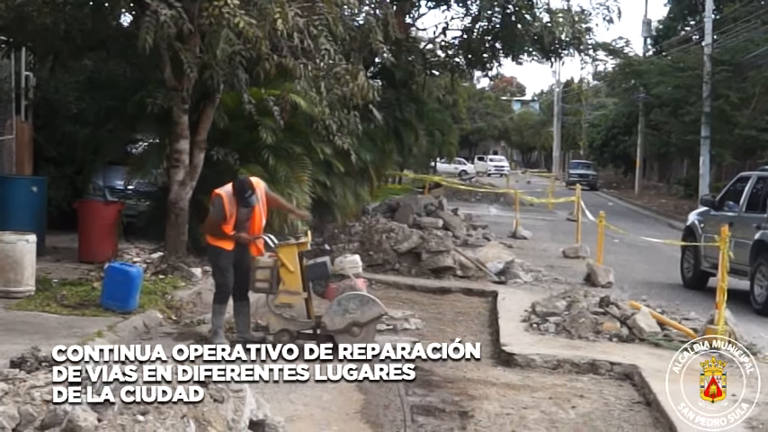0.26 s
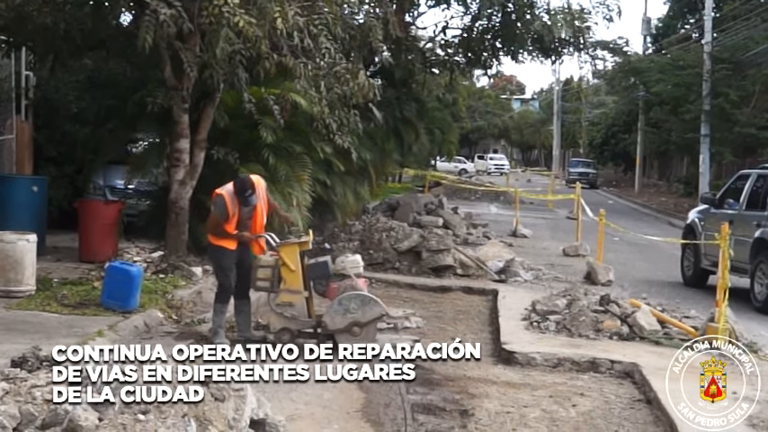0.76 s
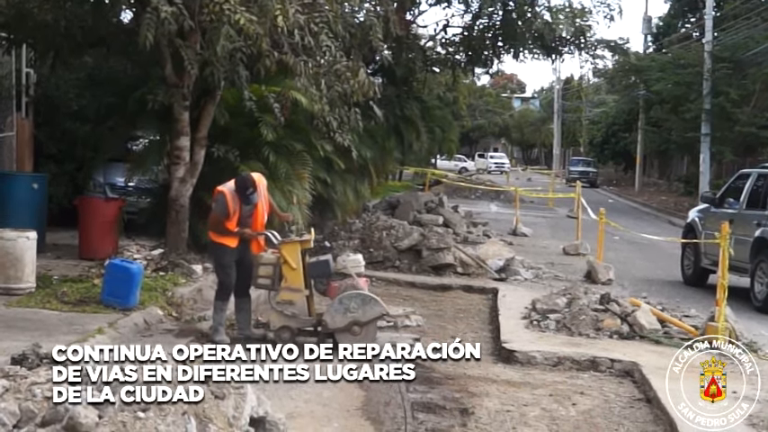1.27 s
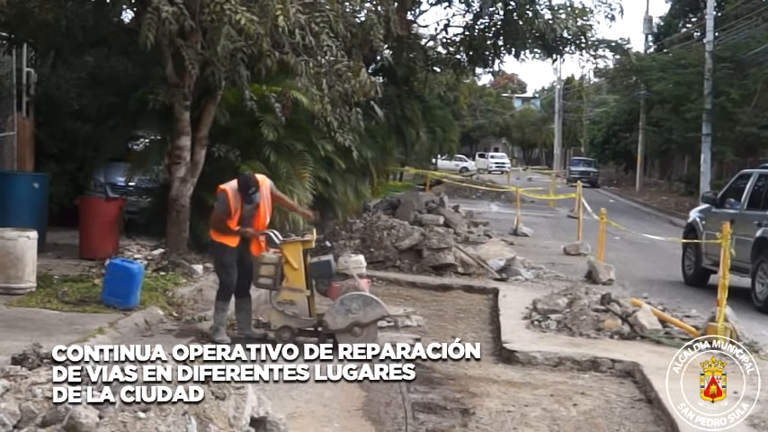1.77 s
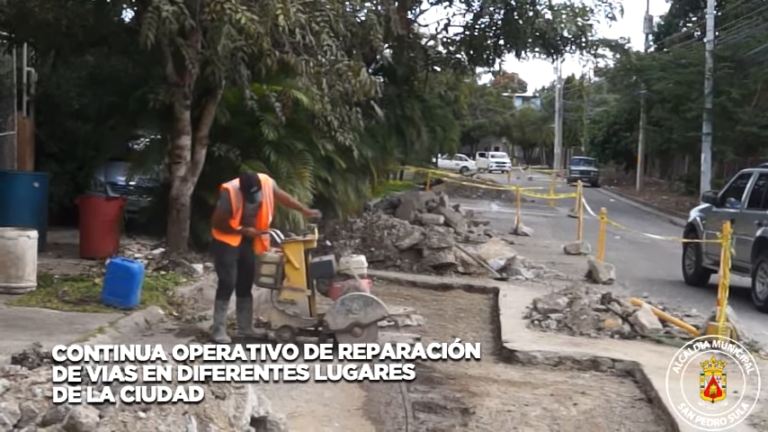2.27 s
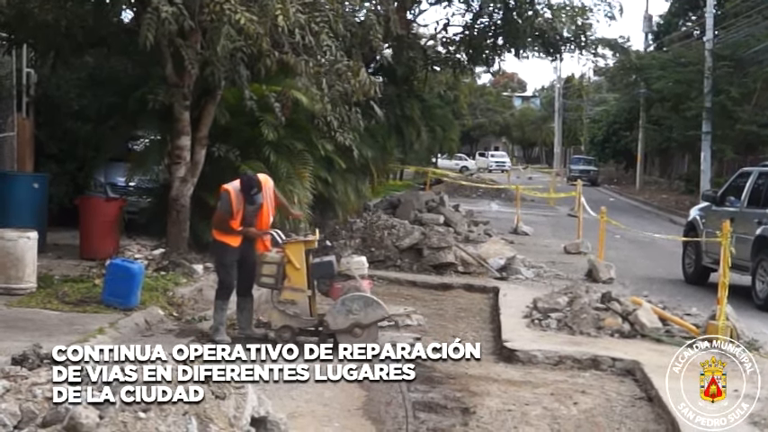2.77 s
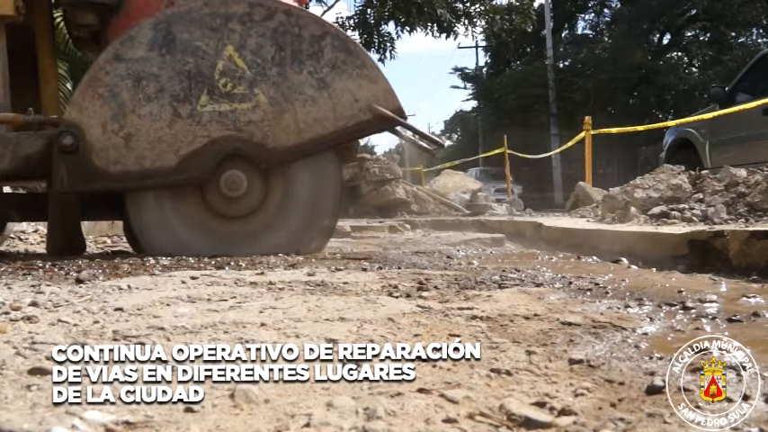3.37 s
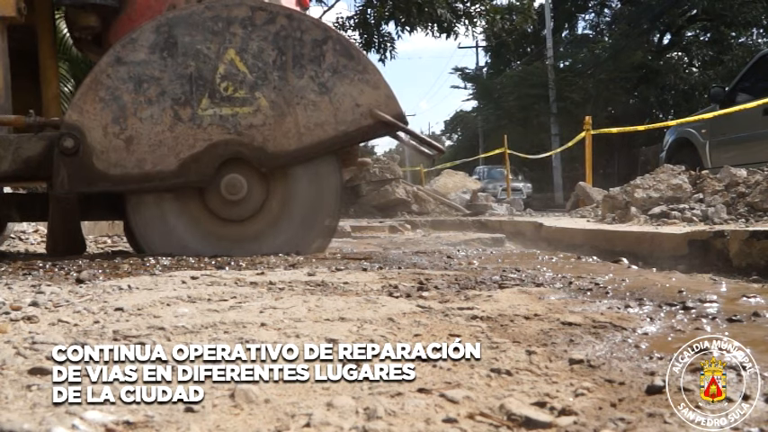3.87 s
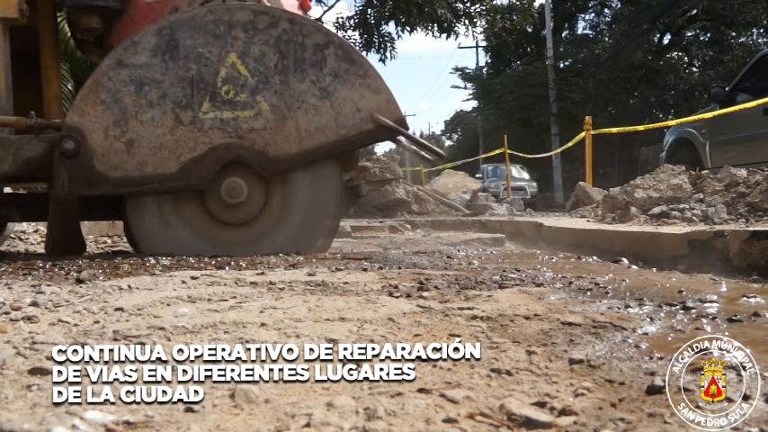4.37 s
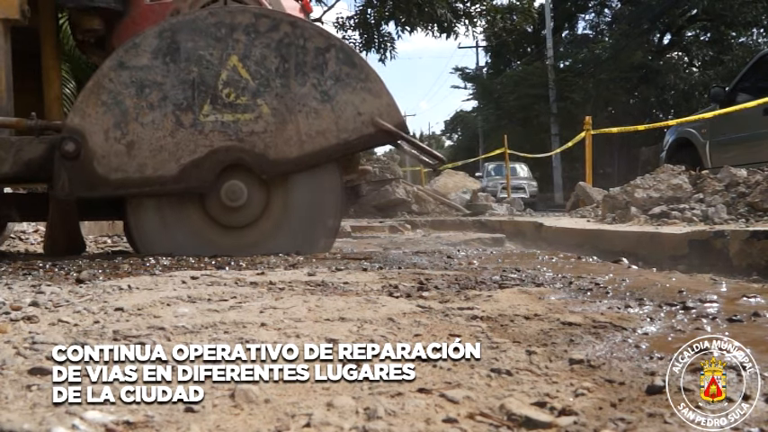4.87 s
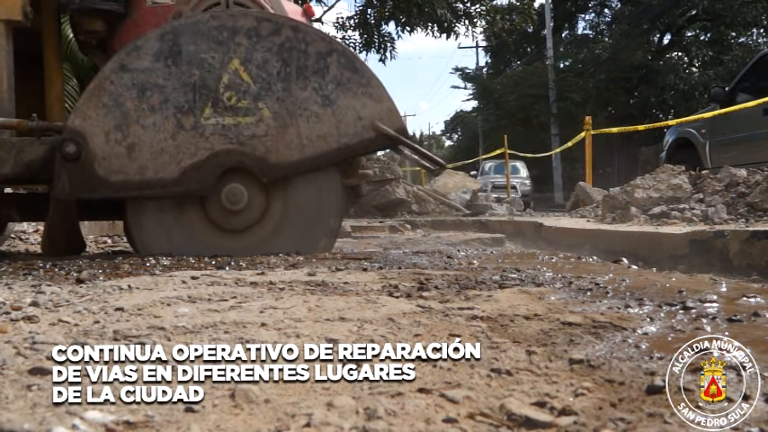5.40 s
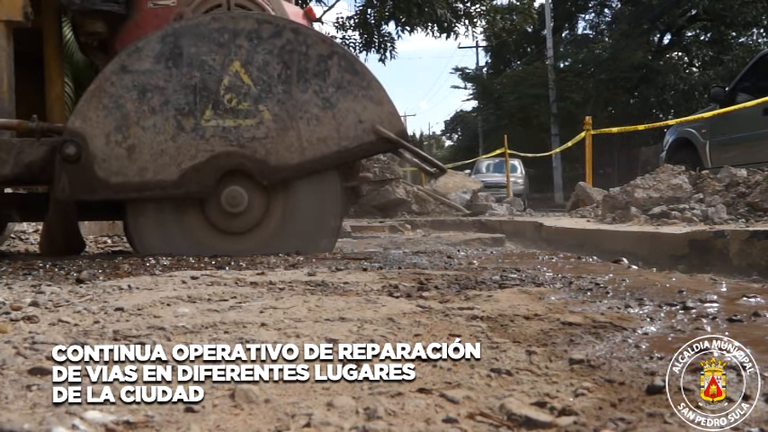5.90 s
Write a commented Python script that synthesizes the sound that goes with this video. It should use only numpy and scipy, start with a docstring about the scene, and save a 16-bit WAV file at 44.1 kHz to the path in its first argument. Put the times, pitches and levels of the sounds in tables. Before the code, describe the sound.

Outdoors at a roadworks, a petrol-powered walk-behind saw cuts wet concrete without pause. Bright, gritty hiss and thin, high metallic ringing dominate, fluttering rapidly with each blade turn. Beneath them, the steel guard drones and rasps, and a single-cylinder engine putters low. The saw labours briefly, then speeds up slightly; ringing gradually gives way to hiss. Close, dry microphone, faint broad background noise.

```python
"""Petrol saw cutting wet concrete

A walk-behind saw cuts a road outdoors. Torn grit hisses and the steel disc rings with thin high tones.
The scraping rim drones and rasps in the steel guard; a knock on every turn makes the guard boom.
Multiples of the blade speed hum in the frame; narrow bands squeal and wide bands swell breathily.
The single-cylinder engine putters below, with soft thuds and a faint, broad background noise.
The saw labours, then picks up speed; as the slot deepens, ringing gives way to hiss."""
import sys
import numpy as np
from scipy import signal
from scipy.fft import rfft, irfft, next_fast_len
from scipy.io import wavfile
from scipy.ndimage import uniform_filter1d

SR = 44100
rng = np.random.default_rng(int(sys.argv[2]) if len(sys.argv) > 2 else 0)


def store_pcm(level_fs):
    """Save levels as 16-bit WAV."""
    pcm = np.round(np.clip(level_fs, -1, 1) * 32767).astype(np.int16)
    wavfile.write(sys.argv[1], SR, np.atleast_2d(pcm).T)


N = 270950
T = np.arange(N) / SR  # time in seconds
SIZE = next_fast_len(N, real=True)
FREQ = np.maximum(np.arange(SIZE // 2 + 1) * SR / SIZE, 1)  # in Hz; the floor avoids dividing by zero
BLADE_HZ, BLADE_SAG_HZ = 28.892, 0.414  # free turning speed; how much strain slows it


def undb(db):
    """Turn decibels into gain."""
    return 10 ** (np.asarray(db) / 20)


def level(x, db=0):
    """Scale a sound to an rms level in dB."""
    return x * undb(db) / np.sqrt(np.mean(x ** 2))


def curves(table):
    """Draw straight lines through a time table and return its columns sample by sample."""
    seconds, *columns = np.transpose(table)
    return [np.interp(T, seconds, column) for column in columns]


def walk(rate):
    """Make a smooth random curve of spread 1 from `rate` random steps per second, averaged twice."""
    hold = int(SR / rate)
    steps = np.repeat(rng.standard_normal(N // hold + 1), hold)
    smooth = uniform_filter1d(uniform_filter1d(steps, hold), hold)
    return level(smooth)[:N]


def bell(centre_s, spread_s):
    """Rise and fall smoothly around one moment, as a Gaussian curve."""
    return np.exp(-0.5 * ((T - centre_s) / spread_s) ** 2)


def filtered(x, response):
    """Pass a sound through a frequency response given on FREQ."""
    return irfft(rfft(x, SIZE) * response, SIZE)[:N]


def colour(x, points):
    """Shape a sound by a spectrum of frequency and dB points, at rms 1."""
    hz, db = np.transpose(points)
    spectrum_db = np.interp(np.log(FREQ), np.log(hz), db, left=-90, right=-90)
    return level(filtered(x, undb(spectrum_db)))


def resonance(hz, width):
    """Give the frequency response of one damped mode, with gain 1 at its centre."""
    return 1 / (1 + 1j * (FREQ ** 2 - hz ** 2) / (FREQ * width))


def body(x, modes):
    """Ring a set of modes in which neighbours move in opposite directions."""
    response = 0
    for k, (hz, width, db) in enumerate(modes):
        response = response + (-1) ** k * undb(db) * resonance(hz, width)
    return level(filtered(x, response))


def glide(x, hz, width, order=1):
    """Ring a moving resonance: shift its centre down to zero, low-pass the sound and shift it back."""
    carrier = np.exp(2j * np.pi * np.cumsum(hz) / SR)
    lowpass = signal.butter(order, width / 2, fs=SR, output="sos")
    return np.real(carrier * signal.sosfilt(lowpass, x / carrier))


def revolutions(hz, start):
    """Count the turns made so far by adding up the speed."""
    return start + np.cumsum(hz) / SR


def pulse_train(at, gains_db):
    """Place one click of a given gain at each sample number."""
    return np.bincount(at, undb(gains_db), N + 1)[:N]


def contact(turns, depth_db, rise, scatter_db):
    """The eccentric blade's pressure rises for a share of each turn, then eases, never quite alike."""
    press = np.interp(turns % 1, [0, 1 - rise, 1], [1, -1, 1])
    scatter = rng.standard_normal(int(turns[-1]) + 2)
    uneven = np.interp(turns, np.arange(len(scatter)), scatter)
    return level(undb(depth_db * press + scatter_db * uneven))


def rim_scrape(turns, memory, points=1536):
    """The rim's roughness partly comes round again on every turn and changes as the cut advances."""
    track = rng.standard_normal((int(turns[-1]) + 2, points))
    for k in range(1, len(track)):
        track[k] = memory * track[k - 1] + np.sqrt(1 - memory ** 2) * track[k]
    return np.interp(turns * points, np.arange(track.size), track.ravel())


# How hard the rim grinds. Each row: time in seconds, base level of hiss and ringing together in dB.
CUT_LEVEL = [(0.0, -32.5), (.3, -31.5), (.48, -32.5), (.9, -32), (1.98, -32.5), (2.0, -30), (2.28, -31),
             (2.72, -30.2), (2.78, -32), (2.95, -29.5), (3.3, -29.5), (4.34, -30.5), (4.85, -29.5),
             (5.25, -29), (5.7, -31.5), (5.95, -32), (6.03, -30), (6.14, -32)]
# The rim bites a harder stone. Each row: time in seconds, extra pressure in dB, spread in seconds.
STONE_BITES = [(0.222, 2, 0.0063), (0.323, 4, 0.0046), (0.62, 2.5, 0.011), (1.375, 3, 0.0054),
               (1.54, 0.5, .025), (2.345, 1.5, 0.0087), (2.457, 0.5, 0.014), (4.01, 2, 0.019),
               (4.265, 0.5, 0.013)]
RING_SHARE, RING_FADE_S = 0.63, 3.4  # the disc's first share of the power; time to fall to 37 % of it


def blade(turns):
    """Grinding is shared between hissing grit and the ringing disc, which the deepening slot damps."""
    bite_db = sum(db * bell(s, spread) for s, db, spread in STONE_BITES)
    pressure = contact(turns, depth_db=2.0, rise=0.57, scatter_db=0.17) * undb(bite_db)
    share = RING_SHARE * np.exp(-T / RING_FADE_S)
    hiss = grit(pressure, share) * np.sqrt(1 - share)
    ringing = disc(pressure) * np.sqrt(share)
    return (hiss + ringing) * undb(curves(CUT_LEVEL)[0])


# Grit torn from the concrete. Each row: frequency in Hz, relative strength in dB.
HISS_SPECTRUM = [(2000, -36), (2750, -8.5), (2980, -1), (3500, 1.6), (3950, 0.5), (5100, -0.5),
                 (7150, -1.7), (7800, -3.5), (8100, -4.5), (8900, 0), (10000, -4), (10600, -4),
                 (10850, -8.5), (11400, -7.5), (13000, -11), (14500, -19.5)]
# Gaps between the disc's modes, where it radiates little of the hiss. Each entry: frequency in Hz.
HISS_GAPS = [3360, 3610, 3800, 4065, 4250, 4810, 5720, 6650, 7410, 9300]
# Tilt of the hiss. Each row: time in seconds, slope in dB per octave.
HISS_TILT = [(0, 2), (.8, 0.6), (1.7, 1), (3.7, 0), (4.9, -0.7), (6.14, -1)]
GAP_WIDTH, GAP_DEPTH = 0.011, 0.27  # share of the frequency; share of the amplitude
HOLLOW_HZ, HOLLOW_DB = 3790, -16.5  # a dip in the hiss, in proportion to the disc's share of the power
HISS_DB = 0.61  # relative to the cut


def grit(pressure, share, flicker_db=1.0, drift_db=0.5):
    """Tiny fractures merge into a hiss; its colour flickers from stone to stone and fills out in the slot."""
    hiss = colour(rng.standard_normal(N) * chipping() * pressure, HISS_SPECTRUM)
    gaps = sum(resonance(hz, GAP_WIDTH * hz) for hz in HISS_GAPS)
    hiss = level(filtered(hiss, 1 - GAP_DEPTH * gaps))
    tilt_db = curves(HISS_TILT)[0]
    octaves = np.log2(FREQ / 6000)
    out = 0
    # overlapping bands a third of an octave apart, each with its own changing level
    for centre in np.arange(-6, 6) / 3:
        band = filtered(hiss, np.maximum(1 - 3 * np.abs(octaves - centre), 0))
        hollow = np.exp(-(4 * (centre - np.log2(HOLLOW_HZ / 6000))) ** 2)
        steady_db = tilt_db * centre + HOLLOW_DB * hollow * share
        random_db = flicker_db * walk(30) + drift_db * walk(1.85)
        out = out + band * undb(steady_db + random_db)
    return out * undb(HISS_DB)


CHIPS_PER_S, CHIP_DECAY_S = 900, 0.0014  # average rate of cracks; time for a crack's power to fall to 37 %
CHIP_SCATTER_DB, CHIP_SHARE = 3, 0.28  # unevenness of the cracks; their share of the hiss power


def chipping():
    """Grains snap off at random: each crack starts at once and dies quickly, over an even abrasion."""
    happens = rng.random(N) < CHIPS_PER_S / SR
    scatter = np.clip(rng.standard_normal(N), -2, 2)
    cracks = happens * undb(CHIP_SCATTER_DB * scatter) ** 2
    power = signal.lfilter([1], [1, -np.exp(-1 / (CHIP_DECAY_S * SR))], cracks)
    return np.sqrt(1 - CHIP_SHARE + CHIP_SHARE * power / power.mean())


# Modes of the steel disc. Each row: frequency in Hz, width in Hz, relative strength in dB.
DISC_MODES = [(2995, 90, -8), (3250, 120, -10.5), (3470, 70, -12), (3690, 40, -11), (3915, 50, -11),
              (4145, 20, -4), (4323, 26, -5.5), (4478, 40, -3.5), (4936, 22, -1), (5052, 34, -6),
              (5190, 80, -8), (5525, 50, -6.5), (5927, 40, -8), (6150, 50, -10), (6320, 60, -11),
              (6512, 70, -8.5), (6885, 50, -8.5), (7020, 50, -9), (7145, 60, -8), (7590, 40, -10),
              (8020, 80, -10), (8250, 140, -11), (8680, 200, -11), (9805, 60, -12), (11080, 70, -18),
              (11770, 70, -18), (12330, 110, -22), (13030, 60, -23), (13570, 80, -21), (13950, 90, -23)]
RING_TILT_DB_PER_S = 1.0  # growth of the tilt per octave: the slot damps the low modes first
LOW_MODES_DB, LOW_MODES_RISE_S, LOW_MODES_HZ = -1.5, 0.26, 3500  # modes below 3500 Hz start weaker


def disc(pressure, wander_db=1.5, drift_db=1.0):
    """Friction drives each mode of the disc; modes grow and fade alone, and the ringing slowly brightens."""
    tilt_db = RING_TILT_DB_PER_S * T
    out, power = 0, 0
    for hz, width, db in DISC_MODES:
        octaves = np.log2(hz / 5000)
        low_db = LOW_MODES_DB * np.exp(-T / LOW_MODES_RISE_S) if hz < LOW_MODES_HZ else 0
        random_db = wander_db * walk(8.9) + drift_db * walk(1.56)
        gain = undb(db + low_db + tilt_db * octaves + random_db)
        out = out + gain * filtered(rng.standard_normal(N) * pressure, resonance(hz, width))
        power = power + width * gain ** 2
    # dividing by the expected size keeps the total even while the modes change
    return level(out / np.sqrt(power))


# Narrow rows are squealing modes of the disc or the guard as the rim rubs; wide rows are breathy swells of hiss
# or rasp. Each row: time in seconds, spread in seconds, frequency in Hz, width in Hz, level in dB.
SQUEALS_AND_SWELLS = [(.16, .08, 4145, 14, -46), (0.308, 0.043, 4936, 11, -36.5), (.27, .06, 4478, 40, -44),
                      (.55, .1, 4323, 20, -49), (.64, .09, 688, 30, -48), (.62, .06, 7135, 50, -45),
                      (.76, .03, 4936, 12, -44), (.85, .13, 4145, 14, -47.5), (1.07, .12, 4930, 14, -44.5),
                      (1.21, 0.04, 4145, 12, -40), (1.2, .06, 4323, 20, -47), (1.4, .06, 5525, 24, -45),
                      (1.68, 0.06, 4940, 16, -47), (2.05, .04, 5052, 40, -44), (2.0, 0.2, 5535, 35, -50),
                      (2.05, 0.18, 7135, 60, -46), (2.45, 0.13, 5052, 30, -46), (2.7, .3, 4478, 40, -49),
                      (3.1, .09, 4936, 20, -45), (3.08, .1, 5052, 50, -49), (3.35, .2, 4465, 40, -46),
                      (3.55, 0.2, 5530, 55, -46), (3.7, .25, 4936, 18, -51), (3.6, 0.59, 8800, 200, -47),
                      (4.83, 0.08, 1350, 170, -47), (5.3, 0.23, 1300, 160, -50), (4.0, .14, 832, 50, -55),
                      (5.2, .4, 828, 60, -54.5)]


def squeals_and_swells(turns, waver_hz=5):
    """Noise in a narrow band squeals, in a wide band it breathes; each wavers and flutters with the turns."""
    flutter = contact(turns, depth_db=2.0, rise=0.27, scatter_db=3.2)
    out = 0
    for s, spread, hz, width, db in SQUEALS_AND_SWELLS:
        band = glide(rng.standard_normal(N), hz + waver_hz * walk(13), width, order=2) * flutter
        swell = bell(s, spread)
        loudness = np.sqrt(np.average(band ** 2, weights=swell))
        out = out + band * swell * undb(db) / loudness
    return out


# Low resonances of guard and frame. Each row: resting frequency in Hz, width in Hz, relative strength in dB.
DRONE_MODES = [(283, 142, -9.5), (401.5, 113, -3), (495, 91, -0.5), (614, 104, -3.5), (730.5, 87, -3.5)]
# Higher resonances of the guard. Each row: frequency in Hz, width in Hz, relative strength in dB.
RASP_MODES = [(1013, 470, -3.5), (1234, 80, 4.5), (1365, 88, 3), (1512, 116, 5), (1681, 110, 3),
              (1933, 82, 3.5), (2096, 112, 3), (2418, 88, 3), (2510, 83, 1.5), (2725, 80, -0.5)]
# How hard the guard shakes. Each row: time in seconds, drone level in dB, rasp level in dB.
GUARD_SHAKE = [(0, -39.5, -43.5), (.25, -41, -42.5), (.4, -44, -45), (1.1, -41, -43), (1.55, -42.5, -45.5),
               (2.1, -41.5, -45), (3.3, -42, -44.5), (4.5, -43.5, -45), (4.9, -41, -43), (5.8, -44, -46),
               (6.14, -42.5, -44.5)]
GUARD_REST_HZ, GUARD_FOLLOW = 288, 0.44  # frame pitch at rest; how far the drone follows that pitch


def guard(turns):
    """The rim shakes the guard: a hollow drone that shifts as the saw rocks, and a rasp pulsing each turn."""
    drone_db, rasp_db = curves(GUARD_SHAKE)
    shift = (curves(FRAME_RESONANCE)[0] / GUARD_REST_HZ) ** GUARD_FOLLOW
    scrape = rim_scrape(turns, memory=0.48)
    scrape = scrape * contact(turns - 0.2, depth_db=0.0, rise=0.35, scatter_db=1.0)
    drone = 0
    for k, (hz, width, db) in enumerate(DRONE_MODES):
        drone = drone + (-1) ** k * undb(db) * glide(scrape, hz * shift, width)
    drone = level(filtered(drone, resonance(377, 650)))
    chips = undb(2.0 * walk(500))  # fast random flicker
    pulsing = contact(turns, depth_db=3.5, rise=0.67, scatter_db=-1.03)
    rasp = body(rim_scrape(turns, memory=0.32) * chips * pulsing, RASP_MODES)
    return drone * undb(drone_db) + rasp * undb(rasp_db)


# The guard's main resonance wanders. Each row: time in seconds, frequency in Hz, level in dB.
GUARD_BOOM = [(0, 490, -43), (.33, 500, -55.5), (.48, 495, -42), (.57, 500, -51), (.7, 503, -45.5),
              (1.17, 493, -46), (1.35, 504, -54), (1.6, 511, -45.5), (1.85, 535, -49.5), (2.1, 600, -49.5),
              (2.5, 603, -48), (2.9, 605, -52), (3.4, 619, -57), (3.9, 594, -53), (4.2, 497, -48),
              (4.8, 498, -47), (5.5, 510, -52.5), (6.14, 490, -70)]


def throb(turns, delay=0.1, jitter=0.006, scatter_db=1.2, width=44):
    """The blade knocks once a turn, never quite evenly, and the guard booms in step."""
    knocks = np.arange(int(turns[-1]) + 1)
    chance = rng.standard_normal((len(knocks), 2))
    at = np.searchsorted(turns, knocks + delay + jitter * chance[:, 0])  # delay and jitter in turns
    pulses = pulse_train(at, scatter_db * chance[:, 1])
    hz, db = curves(GUARD_BOOM)
    return level(glide(pulses, hz, width, order=2)) * undb(db)


# A frame resonance shifts as the saw rocks; the guard's drone follows its pitch too. Each row:
# time in seconds, frequency in Hz, level at its centre in dB, level at its overtone's centre in dB.
FRAME_RESONANCE = [(0, 240, -51, -51), (.5, 276, -51, -53), (.8, 276, -48.5, -52), (1.85, 273, -49, -50),
                   (2.1, 303, -53, -54), (2.7, 308, -47.5, -52), (3.1, 301, -54, -54), (3.7, 284, -50, -47),
                   (4.1, 291.6, -60, -47.5), (4.7, 296, -51, -48), (4.95, 300, -53, -55),
                   (5.2, 296, -63, -64)]
FRAME_WIDTH_HZ, OVERTONE_RATIO = 32, 1.44  # width of both resonances; pitch of the second over the first


def hum(turns, wander_db=1.0, slip=0.48):
    """Tones locked to the blade's turning are loudest where they meet a resonance of the frame."""
    centre, frame_db, overtone_db = curves(FRAME_RESONANCE)

    def near(hz, resonance_hz):
        """Fall off with distance from the resonance."""
        return 1 / (1 + (2 * (hz - resonance_hz) / FRAME_WIDTH_HZ) ** 2)

    out = 0
    for k in range(8, 17):  # multiples of the blade speed
        phase = 2 * np.pi * (k * turns + rng.random()) + slip * walk(6.5)
        tone = np.sqrt(2) * np.sin(phase) * undb(wander_db * walk(2.02))
        main = undb(frame_db) * near(k * BLADE_HZ, centre)
        overtone = undb(overtone_db) * near(k * BLADE_HZ, OVERTONE_RATIO * centre)
        out = out + tone * (main + overtone)
    return out


# The exhaust pulse and the intake pulse of each cycle.
# Each row: delay in cycles, frequency in Hz, width in Hz, level in dB before the outlet.
ENGINE_STROKES = [(0, 141, 287, -49.5), (0.271, 103.5, 118, -55.5)]
ENGINE_HZ, ENGINE_SAG_HZ = 20.761, 0.211  # free cycles per second; how much strain slows them
HUNT_HZ, HUNT_DEPTH_HZ = 0.87, 0.175  # rate and size of the governor's slow speed swing
ENGINE_DB, STRAIN_DB = -2.5, 2.5  # gain running freely; extra gain when labouring
LABOUR_SCATTER_DB, LABOUR_JITTER = 0.3, 0.015  # extra unevenness under strain: size; timing in cycles


def engine(strain, scatter_db=0.46, jitter=0.0034, outlet_hz=52):
    """Each four-stroke cycle thumps, then gulps; the governor hunts, and strain slows and roughens the beat."""
    hunting = HUNT_DEPTH_HZ * np.sin(2 * np.pi * HUNT_HZ * T + 0.25)
    cycles = revolutions(ENGINE_HZ - ENGINE_SAG_HZ * strain + hunting, -0.438)
    firings = np.arange(int(cycles[-1]) + 1)
    labour = np.interp(firings, cycles, strain)
    timing_spread = jitter + LABOUR_JITTER * labour
    size_spread_db = scatter_db + LABOUR_SCATTER_DB * labour
    out = 0
    for delay, hz, width, db in ENGINE_STROKES:
        chance = rng.standard_normal((len(firings), 2))
        at = np.searchsorted(cycles, firings + delay + timing_spread * chance[:, 0])
        pulses = pulse_train(at, size_spread_db * chance[:, 1])
        stroke = level(filtered(pulses, resonance(hz, width) ** 2), db)
        out = stroke - out  # blowing and sucking have opposite signs
    # the small outlet passes the deepest bass weakly
    radiated = filtered(out, resonance(outlet_hz, outlet_hz) * 1j * FREQ / outlet_hz)
    return radiated * undb(ENGINE_DB + STRAIN_DB * strain)


# Soft low thuds. Each row: time in seconds, peak level in dB.
THUD_EVENTS = [(.365, -45), (.415, -46), (.465, -48), (.715, -56), (1.005, -49)]


def thuds(hz=64, spread=0.011):
    """A few dull bumps are low tones, each about two cycles long."""
    out = 0
    for s, db in THUD_EVENTS:
        out = out + undb(db) * np.sin(2 * np.pi * hz * (T - s)) * bell(s, spread)
    return out


# Faint, broad background noise. Each row: frequency in Hz, relative strength in dB.
BACKGROUND_SPECTRUM = [(20, -26), (45, -27), (90, 2), (160, -3), (300, 2), (1000, 0.5), (4000, -1.5),
                       (14000, -30)]


def background():
    """A faint, broad noise, strong from 90 Hz to about 4 kHz, drifts slowly in level."""
    return colour(rng.standard_normal(N), BACKGROUND_SPECTRUM) * undb(-47.5 + walk(2.45))


# The saw labours, then picks up speed. Each row: time in seconds, strain from 0 to 1.
SAW_STRAIN = [(.68, 1), (1.36, 0)]


def scene():
    """Add the blade, guard, frame and engine over the background noise, the same in both channels."""
    strain = curves(SAW_STRAIN)[0]
    turns = revolutions(BLADE_HZ - BLADE_SAG_HZ * strain, 0.648)
    cutting = blade(turns) + squeals_and_swells(turns)
    steelwork = guard(turns) + throb(turns) + hum(turns)
    mix = cutting + steelwork + engine(strain) + thuds() + background()
    return np.tile(mix, (2, 1))


def record(dry, low_cut_hz=45, top_hz=14600, ceiling=0.13):
    """The microphone thins the deepest bass; the recorder rounds the highest peaks and cuts the top."""
    thin = signal.sosfilt(signal.butter(2, low_cut_hz, "highpass", fs=SR, output="sos"), dry)
    rounded = thin / (1 + (thin / ceiling) ** 6) ** (1 / 6)
    return signal.sosfilt(signal.ellip(10, 0.2, 80, top_hz, fs=SR, output="sos"), rounded)


dry = scene()
out = record(dry)
store_pcm(out)
```